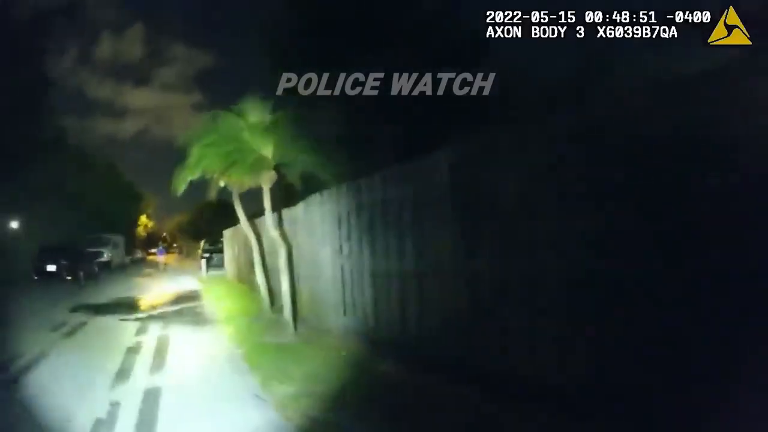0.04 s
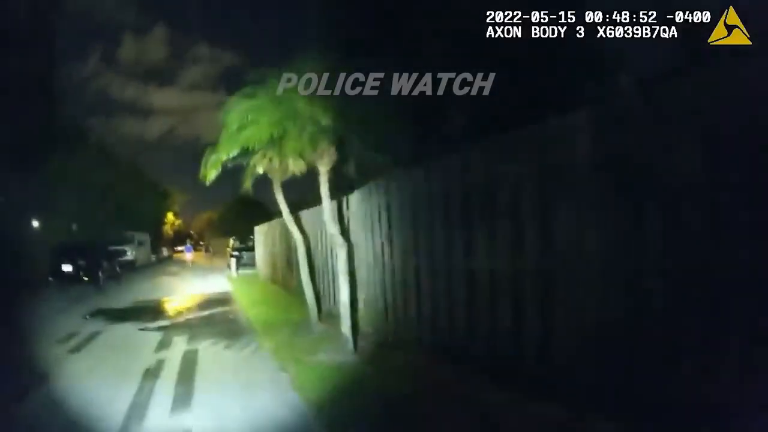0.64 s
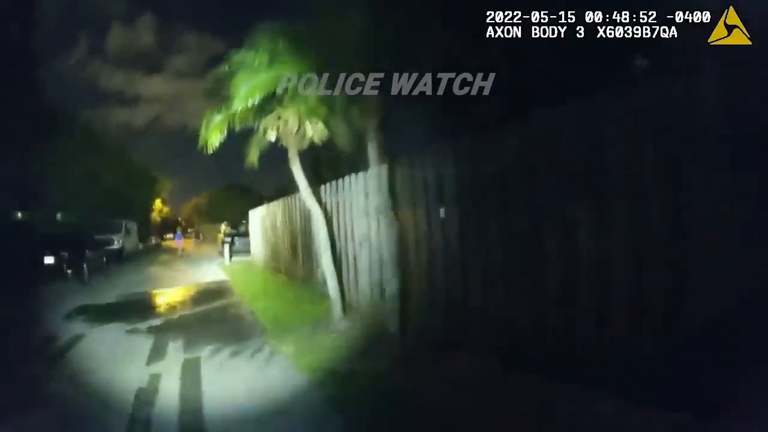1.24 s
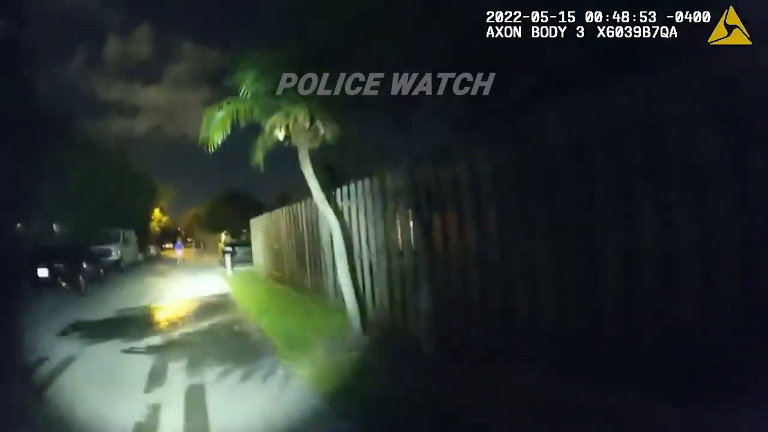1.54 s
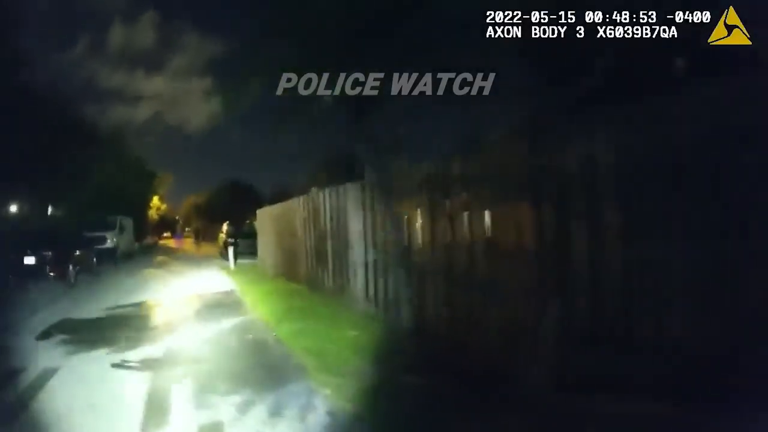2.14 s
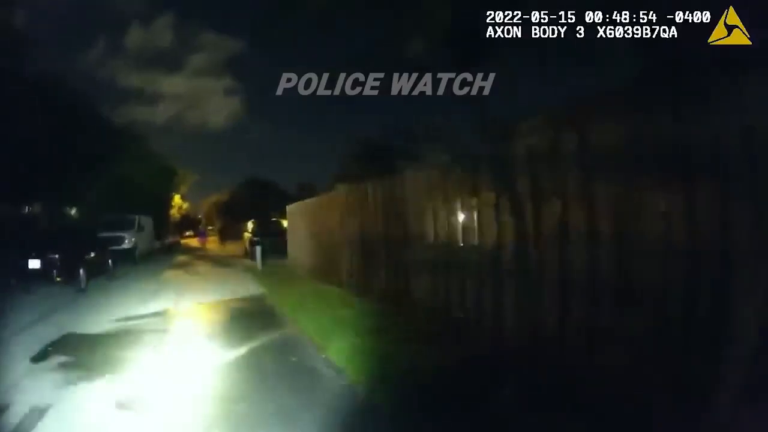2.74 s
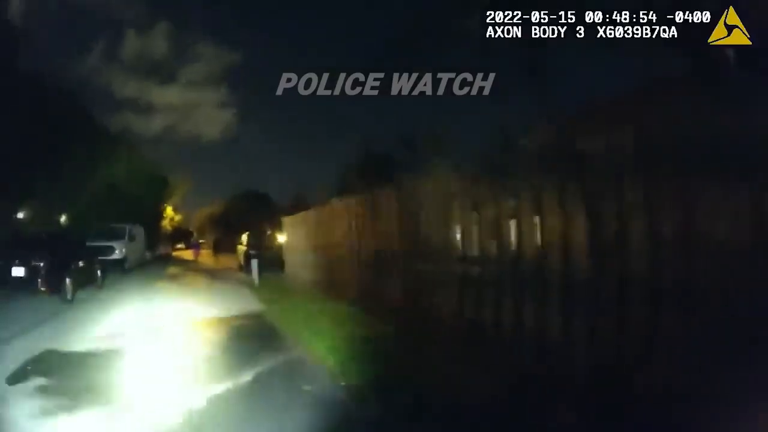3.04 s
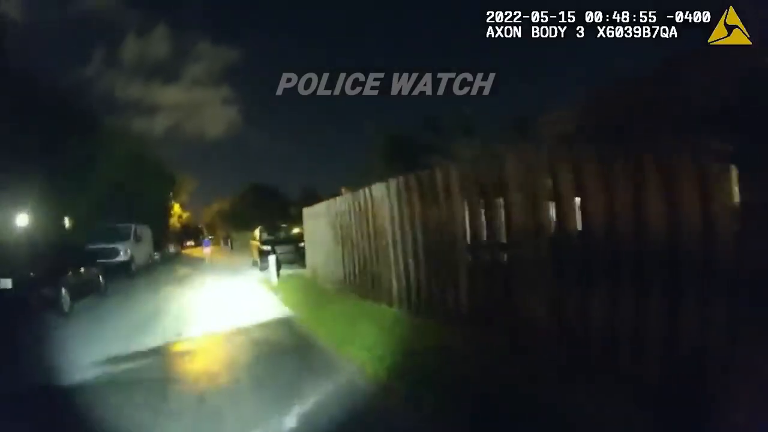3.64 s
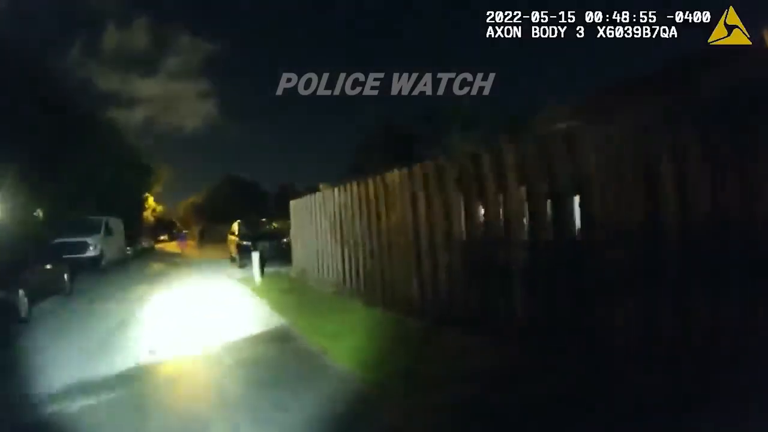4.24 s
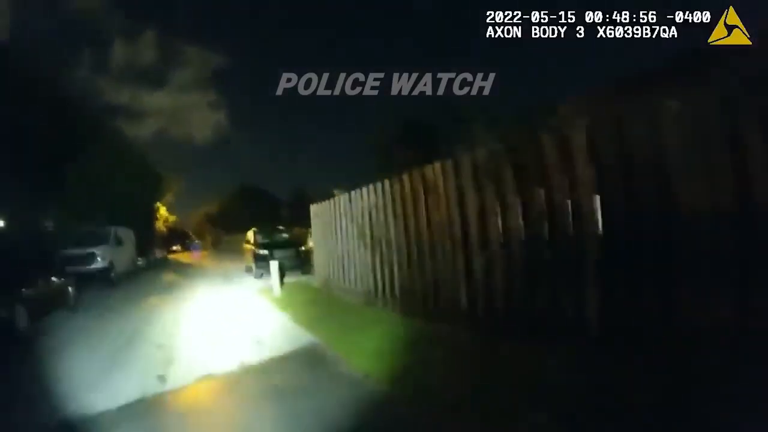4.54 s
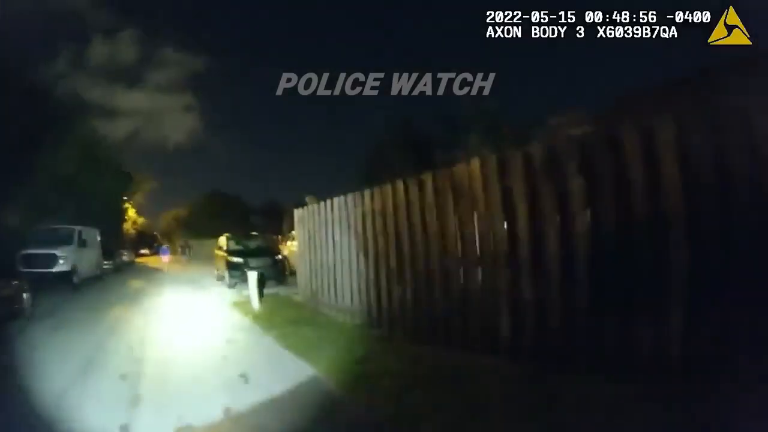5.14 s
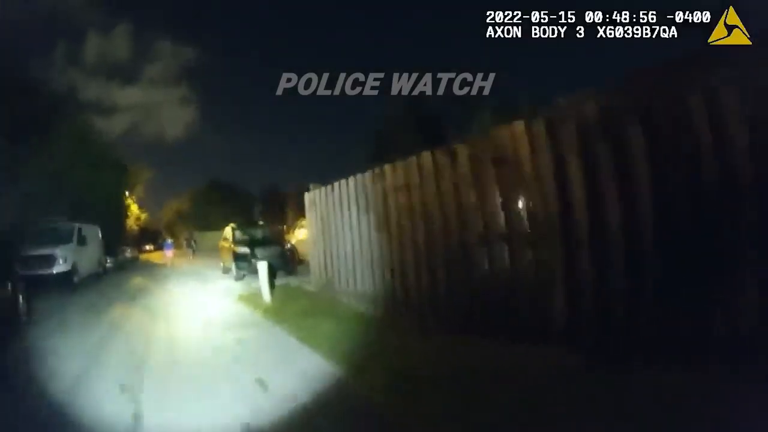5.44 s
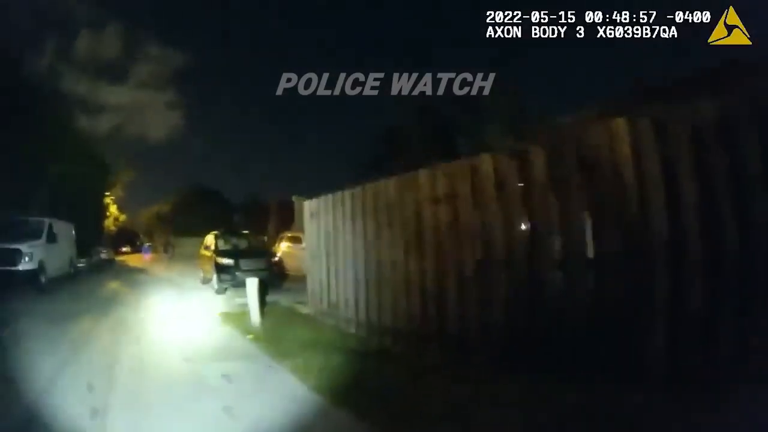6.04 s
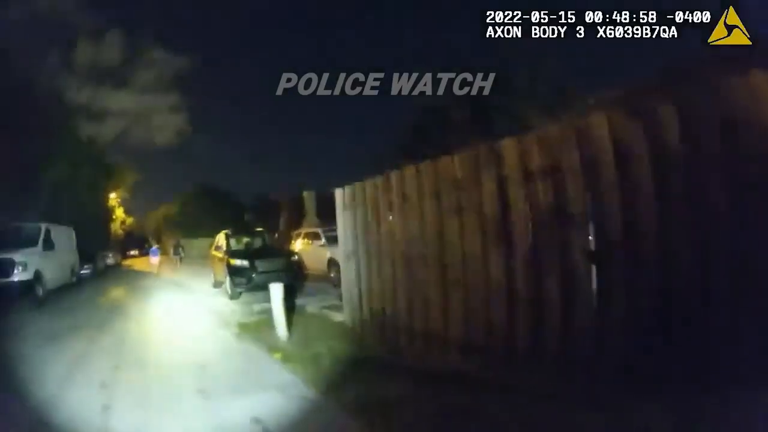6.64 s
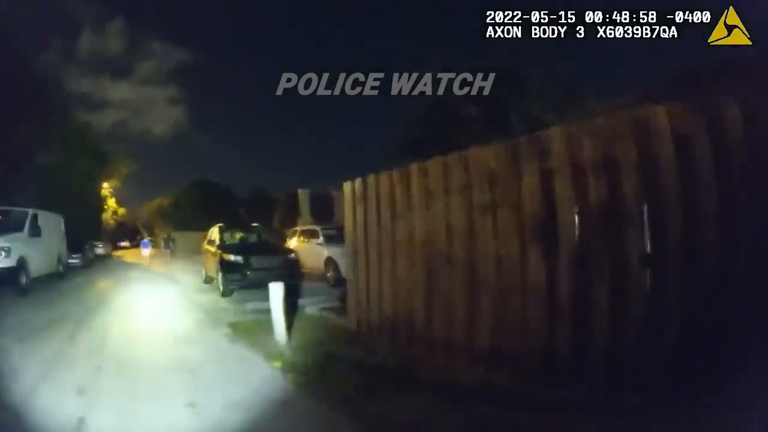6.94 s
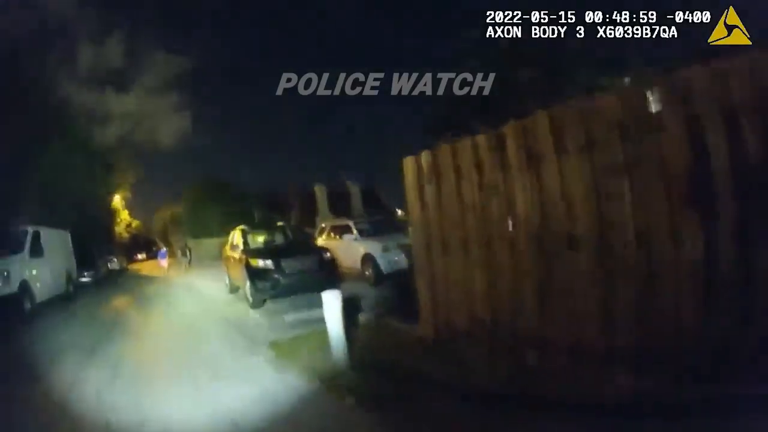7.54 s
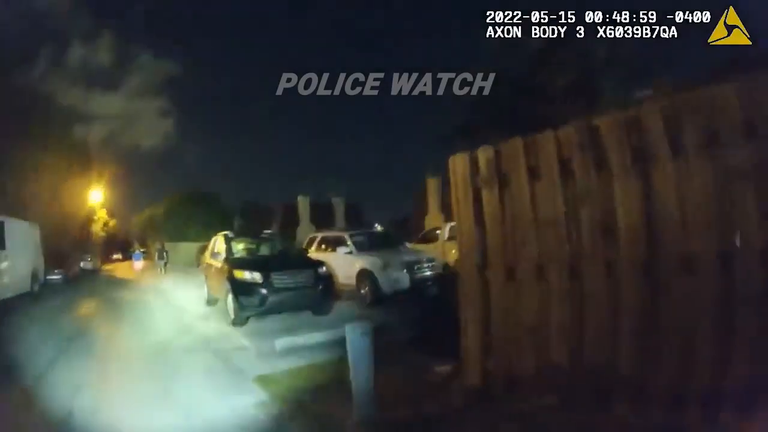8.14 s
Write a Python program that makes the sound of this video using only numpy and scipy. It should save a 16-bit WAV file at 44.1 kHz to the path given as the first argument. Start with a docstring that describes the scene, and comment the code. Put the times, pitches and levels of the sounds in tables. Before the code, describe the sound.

A high, throbbing cricket chorus fills a night street throughout, heard from the chest of someone walking. Footsteps fall on pavement about twice a second, alternately light and heavy, with hollow heel taps, sole slaps and occasional gritty scrapes. Clothes rub with each stride, pouches knock dully and a buckle gives brief high squeaks. One nearby cricket chirps in double pulses until about 4.4 seconds. Katydids rasp in a beat that grows louder, then turns faster at about 6 seconds. A grainy, very high insect buzz swells, peaks from 5.5 to 6.8 seconds and recedes. The loudest pouch knocks come near 5.8 seconds, followed by a cluster of sharp metal ticks and a cloth swish around 6.6. Steps and insects continue to the end, just past 8 seconds. A fence gives a slight short echo, and distant traffic and air conditioners hum faintly underneath.

```python
"""A paved street at night, heard from the chest of someone walking along it.
Insects rub their wings: crickets throb in chorus, katydids rasp, and a conehead (a small
bush cricket) buzzes in the hedge, loudest as it is passed. Heels tap and soles slap and scrape.
Carried gear knocks, squeaks and ticks, and clothes rub with each stride.
A fence gives a short echo; far traffic and air conditioners hum faintly underneath."""
import sys
import numpy as np
from scipy import signal
from scipy.fft import rfft, irfft, next_fast_len
from scipy.io import wavfile
from scipy.ndimage import map_coordinates

SR = 44100
rng = np.random.default_rng(int(sys.argv[2]) if len(sys.argv) > 2 else 0)


def transcribe(signal):
    """Save signal, clipped to [-1, 1], as a 16-bit WAV file at the path in sys.argv[1]."""
    frames = np.atleast_2d(signal).T
    limited = np.clip(frames, -1, 1)
    pcm = np.round(limited * 32767).astype(np.int16)
    wavfile.write(sys.argv[1], SR, pcm)


N = 365588
TIME = np.arange(N) / SR

# steps, light and heavy foot in turn: (time [s], heel level [dB], sole level [dB], heel to sole [s])
STEPS = [(.36, -38.5, -42.5, 0.035), (.884, -33, -35.5, 0.023), (1.466, -41, -43, 0.037),
         (1.9396, -35, -36, 0.022), (2.46, -36, -39, 0.032), (2.9744, -31, -34, 0.019),
         (3.457, -34, -47, 0.032), (3.9596, -31.5, -34, 0.02), (4.454, -55, -38, 0.032),
         (4.9477, -32, -37, 0.022), (5.445, -44, -53, 0.03), (5.967, -42, -38, 0.02),
         (6.47, -46, -41, 0.033), (6.997, -31.5, -35.5, 0.024), (7.509, -35, -38, 0.031),
         (8.029, -32, -36.5, 0.025)]
# the tone of a shoe on pavement: (frequency [Hz], level [dB])
SHOE_TONE = [(90, -27), (220, -13), (360, -2), (520, -.5), (740, 0), (1020, -4), (1400, -17), (2200, -24),
             (4000, -31), (9000, -46)]


def cricket_chorus(throb_db=13, flutter_db=2, early_swell_s=.283, late_swell_s=.299, slows_at_s=3.15):
    """Two groups of crickets ring their wings near one pitch and swell together, later a bit slower."""
    # the chorus: (time [s], level [dB], depth of the throb [0-1], share of the higher group [0-1])
    chorus = [(0, -37.5, 0.16, 0.57), (.7, -37.5, 0.2, 0.77), (3, -37, 0.27, 0.84), (4.1, -38, 0.28, 0.74),
              (5.6, -38, 0.35, 0.4), (8.29, -37, 0.05, 0.03)]
    # tones of the higher and the lower group: (frequency [Hz], level [dB])
    high_tone = [(6250, -35), (6480, -15), (6660, -6), (6795, 0), (6900, -6), (7050, -19), (7450, -40)]
    low_tone = [(5700, -15), (6150, -8.5), (6400, 4.5), (6620, 8), (6800, -33), (7000, 0), (7400, -8)]
    depth, share = curve(chorus, column=2), curve(chorus, column=3)
    swells = (TIME - slows_at_s) / np.where(TIME < slows_at_s, early_swell_s, late_swell_s)
    throb = amp(throb_db * depth * (np.cos(2 * np.pi * swells) - depth / 2))
    high, low = (stereo_noise(tone) * flicker(flutter_db, per_s=100) for tone in (high_tone, low_tone))
    voices = np.sqrt(share) * high + np.sqrt(1 - share) * low
    return pan(voices * throb * amp(curve(chorus)), left_db=-1.1)


def near_cricket(pitch_hz=6770, drift_hz=35, pulse_s=.026):
    """The nearest cricket's wings ring with a clean note, two short pulses to a chirp."""
    # chirps: (time [s], level [dB], delay of the second pulse [s], its level against the first [dB])
    chirps = [(.21, -28, .051, .5), (.52, -31.5, .056, -1), (.822, -33, 0.048, -1.5), (1.115, -46, .055, 8),
              (1.414, -28, 0.045, -6.5), (1.724, -28, .049, -1), (2.228, -31.5, .05, -3),
              (2.502, -34.5, 0.062, 6.5), (2.81, -35.5, 0.05, 1), (3.087, -33.5, 0.055, 2),
              (3.4, -45, 0.042, 0), (3.73, -30, 0.045, -3), (4.013, -33, 0.06, -1), (4.346, -33, 0.044, -9)]
    out, size = np.zeros(N), int(pulse_s * SR)
    shape = np.sqrt(2) * np.sin(np.linspace(0, np.pi, size))
    for s, db, gap_s, second_db in chirps:
        for k in range(2):
            note = np.sin(phase_of(pitch_hz + drift_hz * waver(134, size)))
            add(out, s + k * gap_s - pulse_s / 2, amp(db + k * second_db) * shape * note)
    return pan(out, left_db=-1.5)


def katydids(between_db=-7, far_db=-34.5):
    """A slow singer, then a fast one, scrape out a beat; neighbours and far ones join in at random."""
    # the slow and the fast song: (start [s], end [s], time between strokes [s])
    songs = [(.0391, 6.05, .1347), (6.1113, 8.29, .0724)]
    # loudness of the near singers as the walker passes: (time [s], level [dB])
    passing = [(0, -55), (3.9, -41), (4.3, -40), (5.3, -37.5), (5.8, -39.5), (6.25, -31.5), (6.7, -36),
               (6.92, -34.5), (7.1, -39), (7.5, -37), (8.29, -41)]
    # tones of the slow, the fast and the far singers: (frequency [Hz], level [dB])
    slow_tone = [(4300, -20), (4950, -5), (5500, -6), (6200, 4), (6800, 5.5), (7900, -2.5), (9000, -2.5),
                 (10500, 5.5), (12000, -0.5), (15500, -27)]
    fast_tone = [(4300, -34), (4950, -7), (5500, -6), (6200, 1.5), (7900, -2), (9000, 0), (10500, 5),
                 (12000, -5.5), (15500, -25)]
    far_tone = [(5000, -13), (6800, -4), (7600, 9), (8200, 7.5), (9000, 2), (10500, 13), (12500, -5),
                (15000, -20)]
    slow_times, fast_times = (np.arange(*song) for song in songs)
    near_db = curve(passing) + 11.5
    slow = wing_strokes(slow_times, near_db + .5, slow_tone, fall_s=.027)
    fast = wing_strokes(fast_times, near_db - 2, fast_tone, fall_s=.035)
    between = wing_strokes(loose_times(per_s=19), near_db + between_db, slow_tone, fall_s=.036)
    far = wing_strokes(loose_times(per_s=16), far_db, far_tone, fall_s=.072, rise_s=.013)
    return pan(slow + fast + between + hard_strokes(), left_db=-2.1) + pan(far, left_db=-.6)


def wing_strokes(times, level_db, tone, fall_s, rise_s=.0033, patchy_db=3, vary_db=1.2, vary_s=.003):
    """Tiny wing teeth strike in a scratch that starts fast and fades, a little different each time."""
    out, t = np.zeros((2, N)), np.arange(4096) / SR
    hz = np.fft.rfftfreq(len(t), 1 / SR)
    bands_hz = np.linspace(0, SR / 2, 40)
    shape = rise_and_fade(t, rise_s, fall_s) * np.cos(np.pi / 2 * t / t[-1])
    scratch = stereo_noise(tone) * flicker(db=1.5, per_s=1200)
    for s in times:
        patches = unit_power(amp(patchy_db * np.interp(hz, bands_hz, rng.standard_normal(40))))
        strength = amp(vary_db * rng.standard_normal())
        start = rng.integers(N - len(t))
        stroke = irfft(rfft(scratch[:, start:start + len(t)]) * patches) * shape * strength
        s += vary_s * rng.standard_normal()
        add(out[0], s, stroke[0])
        add(out[1], s, stroke[1])
    return out * amp(level_db)


def hard_strokes(gain_db=-1):
    """Now and then a katydid bears down, and the wing rings around one pitch."""
    # ringing wing strokes: (time [s], level [dB], pitch [Hz])
    strokes = [(5.29, -29.5, 7840), (5.426, -36, 5400), (6.185, -30, 5800), (6.914, -30.5, 6200),
               (7.205, -28, 8600), (7.42, -33, 8240), (7.495, -34, 8050), (7.65, -42, 8000)]
    out, t = np.zeros(N), np.arange(4096) / SR
    shape = rise_and_fade(t, rise_s=.0042, fall_s=.016)
    for s, db, hz in strokes:
        tone = [(hz * .75, -35), (hz * .9, -9), (hz, 0), (hz * 1.1, -9), (hz * 1.4, -22)]
        ring = with_tone(rng.standard_normal(len(t)), tone)
        add(out, s, amp(db + gain_db) * ring * shape / shape.max())
    return out


def coneheads(buzz_db=4.5, fizz_db=2, stroke_hz=172, stroke_depth=.018):
    """Fast wing strokes drag a row of teeth over a hard edge: a grainy buzz with a high fizz on top."""
    # loudness as the walker passes: (time [s], buzz level [dB], fizz level [dB])
    passing = [(0.0, -51, -58), (3.26, -43.5, -51), (5.21, -40.5, -51), (5.57, -33.5, -43),
               (5.66, -35.5, -40), (6.62, -35, -40.5), (6.74, -36.5, -43), (8.04, -45, -53),
               (8.2, -44, -49)]
    # tones of the buzz and the fizz: (frequency [Hz], level [dB])
    buzz_tone = [(3800, -60), (4900, -16), (6000, -19), (7400, -12), (8000, -8), (8800, -13), (9500, -4),
                 (10100, 1), (10450, 5), (10750, -2), (11300, -0.5), (12000, -9.5), (13500, -16)]
    fizz_tone = [(10500, -12), (12000, -15), (13000, -6.5), (14200, -16.5), (15600, -21)]
    strokes = 1 + stroke_depth * np.sin(phase_of(stroke_hz * (1 + .102 * waver(40))))
    grain = unit_power(strokes * flicker(db=1.5, per_s=900))
    fizz = stereo_noise(fizz_tone) * amp(curve(passing, column=2) + fizz_db)
    buzz = stereo_noise(buzz_tone) * amp(curve(passing) + buzz_db)
    return grain * (pan(buzz, left_db=-.36) + pan(fizz, left_db=.8))


def footsteps(heel_gain_db=6, sole_gain_db=1, hollow_hz=560, slip_hz=392, scuff_db=-17, scuff_s=.066):
    """The heel taps with a hollow ring; the rubber sole slaps and scuffs, creaking on the heavy foot."""
    # light and heavy foot: (pitch shift [factor], creak share [0-1], slap rise [s], slap fall [s])
    feet = [(1.12, 0, 0.0036, 0.016), (0.91, 0.65, 0.0044, 0.015)]
    out, t = np.zeros(N), np.arange(-2048, 8192) / SR  # contact is at t = 0
    for k, (s, heel_db, sole_db, roll_s) in enumerate(STEPS):
        shift, creak, rise_s, fall_s = feet[k % 2]
        grit, rub, scuff = rng.standard_normal((3, len(t)))
        blow = (t == 0) + .04 * grit * (t > 0) * np.exp(-abs(t) / .0037)
        tap = with_tone(blow, SHOE_TONE, shift)
        ring = .51 * (t > 0) * np.exp(-abs(t) / .0041) * np.sin(2 * np.pi * hollow_hz * shift * t)
        add(out, s + t[0], amp(heel_db + heel_gain_db) * (ring - tap / abs(tap).max()))
        # the creak is a quick run of clicks, one for each slip of the rubber
        slip_count = np.floor(np.cumsum(slip_hz * (1 + .0822 * waver(69.6, len(t)))) / SR)
        slips = with_tone(np.diff(slip_count, prepend=0), SHOE_TONE, shift)
        press = np.exp(-(t / np.where(t > 0, fall_s, rise_s)) ** 2 / 2)
        slap = (np.sqrt(creak) * slips + np.sqrt(1 - creak) * with_tone(rub, SHOE_TONE, shift)) * press
        tail = with_tone(scuff, SHOE_TONE, shift=2.44) * amp(scuff_db) * spike(t, rise_s, scuff_s)
        add(out, s + roll_s + t[0], amp(sole_db + sole_gain_db) * (slap + tail))
    return out


def scrapes(gain_db=1.5, grains_per_s=700, vary_db=4, crackle_db=-17):
    """A sole drags over loose grit: many small catches sound the shoe and crackle faintly above it."""
    # drags of a shoe: (start [s], length [s], level [dB], pitch shift [factor])
    drags = [(.395, 0.076, -51.5, 1.2), (1.188, 0.2, -55.5, 1.2), (1.401, 0.093, -50, 1.1),
             (2.628, 0.15, -54, 1.15), (3.348, 0.073, -59, 1.1), (3.489, 0.023, -41, 1.25),
             (4.858, 0.059, -46, 1.25), (5.265, 0.051, -46, 0.8), (5.47, 0.18, -49.5, 1.04),
             (7.536, 0.04, -42.5, 1.04)]
    out, size = np.zeros(N), 16384
    for s, length_s, db, shift in drags:
        grains = (rng.random(size) < grains_per_s / SR) * rng.choice([-1, 1], size)
        grains = grains * amp(vary_db * rng.standard_normal(size))
        crackle = amp(crackle_db) * with_tone(grains, [(1600, 0), (6400, 0)])
        sound = with_tone(grains, SHOE_TONE, shift) + crackle
        press = abs(np.sin(np.linspace(0, np.pi, int(length_s * SR)))) ** .3
        add(out, s, amp(db + gain_db) * unit_power(sound[:len(press)] * press))
    return out


def pouch_knocks(gain_db=1, soft_db=-40, soft_hz=908, soft_fall_s=.015, lead_s=.062, scatter_s=.064):
    """Pouches bump the body with a dull, short ring; three soft bumps fall near each heavy step."""
    # the main knocks: (time [s], level [dB], pitch [Hz], fade time [s])
    knocks = [(.666, -37.5, 875, 0.01), (.759, -39, 987, 0.014), (1.42, -36.5, 666, .003),
              (1.759, -36.5, 847, 0.015), (1.802, -33, 963, 0.013), (2.225, -45.5, 790, 0.031),
              (2.845, -33.5, 1070, 0.017), (3.197, -29.5, 872, 0.012), (3.678, -41, 567, 0.011),
              (3.878, -37, 1023, 0.03), (4.128, -31, 740, 0.0046), (4.174, -29.5, 875, 0.004),
              (5.779, -23.5, 1120, 0.0083), (5.784, -24, 660, 0.0082), (5.794, -21.5, 700, 0.0051),
              (5.87, -23.5, 800, 0.0032), (5.896, -38, 980, 0.0065), (6.103, -31, 813, 0.019),
              (6.884, -35, 883, 0.013), (6.93, -36.5, 1135, 0.019), (6.952, -41, 950, 0.0072),
              (7.977, -32, 998, 0.016), (8.04, -25, 840, 0.0037)]
    # tone of a knock pitched at 900 Hz: (frequency [Hz], level [dB])
    knock_tone = [(150, -43), (450, -19), (720, 15.5), (900, 16), (1080, 4.5), (1400, -24), (2500, -10),
                  (7000, -13.5)]
    out, t = np.zeros(N), np.arange(4096) / SR
    soft_bumps = [
        (step[0] - lead_s + scatter_s * when, soft_db + 2 * force, soft_hz * (1 + .1 * pitch),
         soft_fall_s)
        for step in STEPS[1::2] for when, force, pitch in rng.standard_normal((3, 3))]
    for s, db, hz, fall_s in knocks + soft_bumps:
        shape = rise_and_fade(t, rise_s=.00089, fall_s=fall_s)
        rattle = with_tone(rng.standard_normal(len(t)), knock_tone, hz / 900)
        bump = (rattle + np.sin(2 * np.pi * hz * t)) * shape
        add(out, s, amp(db + gain_db) * bump * np.linalg.norm(shape) / np.linalg.norm(bump))
    return out


def buckle_squeaks(gain_db=-1, tight_hz=4400, flutter_db=1.5, third_db=-7.5, grit_db=-17,
                   rattle_db=-22, rattle_s=.012, rattle_per_s=350):
    """Metal sticks and slips: a brief, shaky note, brightest in the middle, then a tiny rattle."""
    # strap buckle squeaks: (start [s], level [dB], pitch [Hz], length [s], overtone strength [dB])
    squeaks = [(0.443, -23.5, 3916, 0.022, 2), (0.949, -50.5, 4180, 0.024, 18.5),
               (2.5383, -28.5, 4100, 0.018, 3), (2.545, -34, 4110, 0.016, 8),
               (3.058, -25.5, 4620, 0.0048, 3.5), (3.533, -29.5, 4120, 0.015, 5.5),
               (3.543, -28, 4100, 0.013, 3), (3.952, -53, 3960, 0.016, 20),
               (4.534, -35, 4120, 0.026, -15.5), (5.041, -28.5, 4590, 0.012, -1),
               (5.5188, -22, 4160, 0.01, 7.5), (6.248, -37, 4050, 0.013, 12), (6.55, -22, 4030, 0.0094, 9),
               (7.085, -21.5, 4550, 0.01, -1.5), (7.282, -39, 4060, 0.026, 2),
               (7.656, -30, 4600, 0.0036, 4)]
    # tone of the buckle's grit and rattle: (frequency [Hz], level [dB])
    buckle_tone = [(3300, -12), (4100, 8), (5500, 2), (8200, 8), (13000, 0)]
    out, t = np.zeros(N), np.arange(4096) / SR
    # unless it is pulled tight and squeaks high, the buckle slips back, lower and weaker
    slips_back = [(s + .021, db - 15, 3900, .011, -12) for s, db, hz, *_ in squeaks if hz < tight_hz]
    for s, db, hz, length_s, overtone_db in squeaks + slips_back:
        size = int(length_s * SR)
        progress = np.linspace(0, 1, size)
        grip = np.sin(np.pi * progress ** .81) ** 2
        # uneven slips shake the pitch while it sinks a little
        bend = .014 * waver(1970, size) + .0085 * waver(250, size) + .014 * (.5 - progress)
        phase = phase_of(hz * (1 + bend))
        second, third = (np.sin(k * phase) * amp(flutter_db * waver(410, size)) for k in (2, 3))
        note = np.sin(phase) * amp(flutter_db * waver(730, size))
        overtones = amp(overtone_db) * grip * (second + amp(third_db) * third)
        grit = amp(grit_db) * with_tone(rng.standard_normal(len(t)), buckle_tone)[:size]
        add(out, s, amp(db + gain_db) * np.sqrt(2) * grip * (note + overtones + grit))
        contacts = rng.standard_normal(len(t)) * (rng.random(len(t)) < rattle_per_s / SR)
        rattle = with_tone(contacts, buckle_tone) * np.exp(-t / rattle_s)
        add(out, s + length_s, amp(db + rattle_db) * rattle)
    return out


def metal_ticks(gain_db=2):
    """A zip pull and the buckle make tiny hard contacts, each over almost at once."""
    # sharp ticks: (time [s], level [dB], pitch [Hz])
    ticks = [(3.06, -39.5, 2640), (3.258, -21, 9200), (3.458, -32.5, 3580), (5.523, -18, 10000),
             (5.5325, -26, 5650), (6.534, -19, 10400), (6.5558, -7, 10300), (6.59, -12, 10400),
             (6.589, -25, 1980), (6.593, -31, 3080), (6.6113, -9, 10500), (6.65, -8.5, 11100),
             (7.106, -25.5, 5100), (7.212, -26, 8800)]
    out, t = np.zeros(N), np.arange(-256, 256) / SR
    shape = spike(t, rise_s=.00084, fall_s=.00031)
    for s, db, hz in ticks:
        tone = [(hz / 2, -19), (hz * .7, -7), (hz, 0), (hz * 1.12, -6), (hz * 1.3, -18)]
        tick = with_tone(rng.standard_normal(len(t)) * shape, tone)
        add(out, s + t[0], amp(db + gain_db) * tick / abs(tick).max())
    return out


def clothing(rub_db=-3.5, swish_db=1, stride_db=6, pouch_db=-7.5, pouch_hz=840, rest_db=-7):
    """Cloth rubs hardest at each step, stirs a hollow note in the pouches, and dips as the foot rests."""
    # loudness of the cloth: (time [s], rub level [dB], swish level [dB])
    cloth = [(0, -48.5, -56.5), (2.35, -52, -59), (2.8, -47, -55.5), (5.4, -44.5, -56.5),
             (5.75, -41, -53.5), (6.35, -38, -42), (6.9, -44, -56.5), (7.3, -48, -51.5), (8.29, -42, -90)]
    # tones of the low rub and the bright swish: (frequency [Hz], level [dB])
    rub_tone = [(120, -31), (230, -4.5), (450, -10), (620, -2), (800, 1), (1020, -4), (1280, -12),
                (1900, -21.5)]
    swish_tone = [(700, -9), (1450, 12.5), (2000, 4.5), (2800, 3.5), (3700, 6), (4400, 4), (5200, 1),
                  (7000, 5)]
    planted = sum(bell(step[0] + .17, width_s=.015) for step in STEPS)
    swing = sum(bell(step[0] + .015, width_s=.23) for step in STEPS)
    rub = stereo_noise(rub_tone) * unit_power(amp(stride_db * swing)) * amp(curve(cloth) + rub_db)
    swish = stereo_noise(swish_tone) * amp(curve(cloth, column=2) + swish_db)
    phase = phase_of(pouch_hz * (1 + .11 * waver(9)))
    note = waver(230) * np.cos(phase) + waver(230) * np.sin(phase)  # noise around a wandering pitch
    pouch = unit_power(note * flicker(db=4, per_s=11)) * amp(curve(cloth) + pouch_db)
    catches = flicker(db=2.5, per_s=60)
    return (catches * (rub + swish) + pouch) * amp(rest_db * planted)


def fence_echo(x, fade_s=.12, delay_s=.008, echoes_per_s=2000):
    """Fence boards and pavement scatter a short, thin echo."""
    t = np.arange(SR // 4) / SR
    echoes = rng.standard_normal((2, len(t))) * (rng.random((2, len(t))) < echoes_per_s / SR)
    echoes *= (t > delay_s) * amp(-60 * t / fade_s)
    return signal.oaconvolve(x[None], echoes / np.linalg.norm(echoes[0]), axes=1)[:, :N]


def air_conditioners(wobble_hz=4.57, waver_db=3):
    """Machines behind the fence hum unsteadily, each swelling as it is passed."""
    # hums: (pitch [Hz], level from afar [dB], time when nearest [s], rise [dB], swell half width [s])
    hums = [(77, -76, 3.35, 15.5, .35), (77.6, -77, 5.63, 15.5, 0.75), (120.5, -74, 7.42, 21, 0.14),
            (263.3, -74, 5.52, 24.5, 1.16)]
    out = np.zeros(N)
    for hz, db, s, rise_db, width_s in hums:
        level = amp(db + rise_db * bell(s, width_s) + waver_db * waver(9))
        out += level * np.sin(phase_of(hz + wobble_hz * waver(25)))
    return out


def far_traffic(gain_db=-1):
    """Distant cars blend into a low rumble that slowly grows."""
    # tone of the rumble: (frequency [Hz], level [dB])
    tone = [(20, -12), (45, -12), (75, -2), (100, -4), (135, -0.5), (220, 4), (330, 0.5), (600, 0),
            (1500, -13), (5000, -19.5)]
    # its loudness: (time [s], level [dB])
    loudness = [(0, -56.5), (1.3, -53.5), (1.9, -53), (4, -51.5), (6.6, -50), (8.29, -49)]
    return amp(curve(loudness) + gain_db) * stereo_noise(tone)


def amp(db):
    """Turns decibels into a number to multiply by."""
    return 10 ** (np.asarray(db) / 20)


def unit_power(x):
    """Scales a sound to an average power of one."""
    return x / np.sqrt(np.mean(x ** 2) + 1e-20)


def value_at(points, hz):
    """Reads between the rows of a frequency table, with octaves evenly spaced."""
    f, value = np.transpose(points)
    return np.interp(np.log(hz + 1), np.log(f + 1), value)


def curve(rows, column=1):
    """One column of a time table, filled in for every sample."""
    rows = np.asarray(rows)
    return np.interp(TIME, rows[:, 0], rows[:, column])


def bell(s, width_s):
    """A smooth rise and fall around a moment."""
    return np.exp(-((TIME - s) / width_s) ** 2 / 2)


def rise_and_fade(t, rise_s, fall_s):
    """A shape that climbs from silence and dies away."""
    return (1 - np.exp(-t / rise_s)) * np.exp(-t / fall_s)


def spike(t, rise_s, fall_s):
    """A shape with a sharp peak at t = 0."""
    return np.exp(-abs(t) / np.where(t > 0, fall_s, rise_s))


def phase_of(hz):
    """The running angle of a wave whose pitch changes."""
    return 2 * np.pi * np.cumsum(hz) / SR


def waver(per_s, size=N):
    """A random wobble, about one in size, that takes per_s new values a second."""
    points = rng.standard_normal(16384)
    return map_coordinates(points, [np.arange(size) * per_s / SR], order=1, mode="wrap") * np.sqrt(1.5)


def flicker(db, per_s):
    """A loudness that wobbles at random by about db decibels."""
    return unit_power(amp(db * waver(per_s)))


def loose_times(per_s):
    """Times that keep a rate but no beat."""
    beats = np.arange(0, TIME[-1], 1 / per_s)
    return beats + rng.random(len(beats)) / per_s


def with_tone(x, tone, shift=1):
    """Filters a sound by a tone table, falling steeply past its ends; the result has a power of one."""
    size = next_fast_len(x.shape[-1])
    hz = np.fft.rfftfreq(size, 1 / SR) / shift + 1
    octaves_outside = abs(np.log2(hz / np.clip(hz, tone[0][0], tone[-1][0])))
    gain = amp(value_at(tone, hz) - 18.6 * octaves_outside)
    return unit_power(irfft(rfft(x, size) * gain, size)[..., :x.shape[-1]])


def stereo_noise(tone):
    """Noise with a given tone: left and right are alike in the bass, less so in the treble."""
    # how alike the two sides are: (frequency [Hz], likeness [0-1])
    likeness = [(50, .975), (500, .985), (1200, .94), (2800, .75), (5000, .68), (6800, .66), (8200, .5),
                (10400, .42), (15000, .42)]
    size = next_fast_len(N)
    mid, side = rfft(rng.standard_normal((2, size)))
    alike = value_at(likeness, np.fft.rfftfreq(size, 1 / SR))
    side *= np.sqrt((1 - alike) / (1 + alike))
    return with_tone(irfft([mid + side, mid - side], size), tone)[:, :N]


def pan(x, left_db):
    """Leans a sound to the left, or to the right if left_db is negative."""
    return x * amp([[left_db / 2], [-left_db / 2]])


def add(mix, s, sound):
    """Mixes a sound in at s seconds."""
    part = mix[max(round(s * SR), 0):][:len(sound)]
    part += sound[:len(part)]


def scene():
    """The walker among the insects; shoes and pouches echo slightly more than the metal parts."""
    thuds = footsteps() + scrapes() + pouch_knocks()
    metal = buckle_squeaks() + metal_ticks()
    echo = fence_echo(amp(-16) * thuds + amp(-17) * metal)
    walker = pan(thuds, left_db=-.22) + pan(metal, left_db=-2.4) + echo + clothing()
    town = air_conditioners() + far_traffic()
    insects = cricket_chorus() + near_cricket() + coneheads() + katydids()
    return insects + walker + town


def record(dry):
    """Cuts off the very highest treble, above 15750 Hz."""
    low_pass = signal.firwin(511, 15750, window=("kaiser", 9), fs=SR)
    return signal.oaconvolve(dry, low_pass[None], "same", axes=1)


dry = scene()
out = record(dry)
transcribe(out)
```